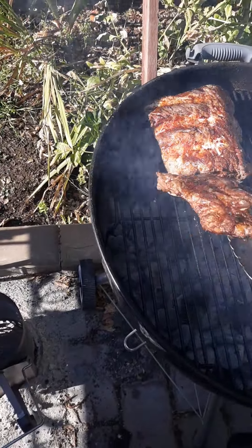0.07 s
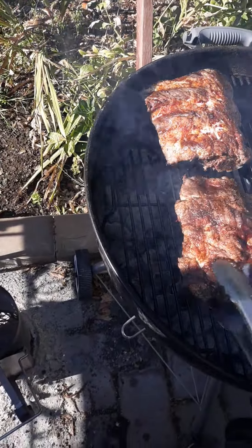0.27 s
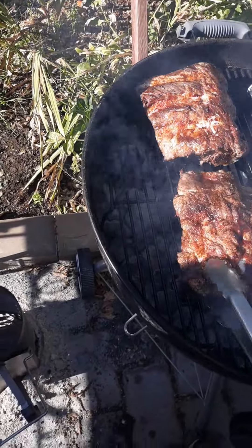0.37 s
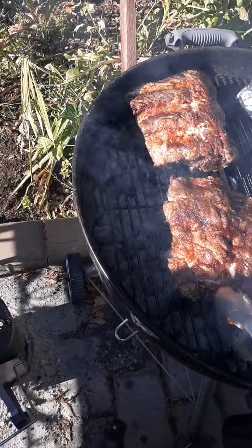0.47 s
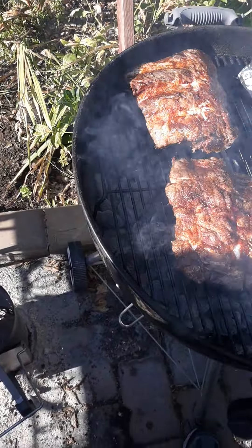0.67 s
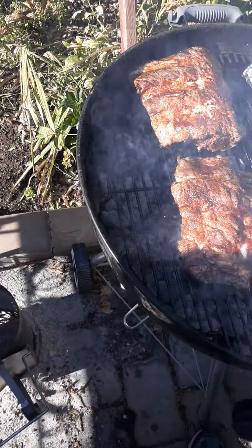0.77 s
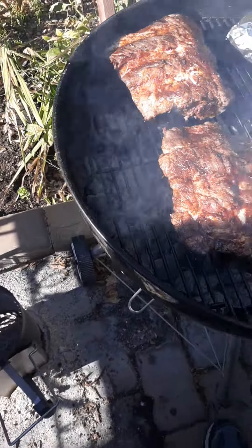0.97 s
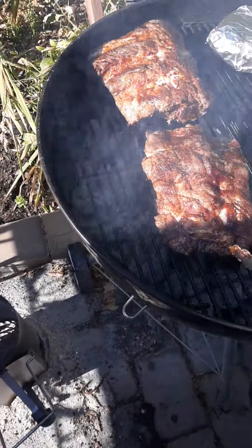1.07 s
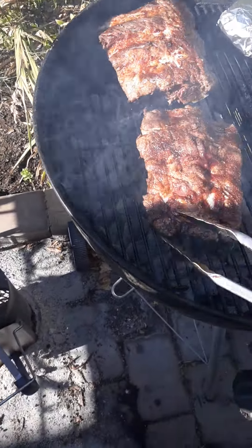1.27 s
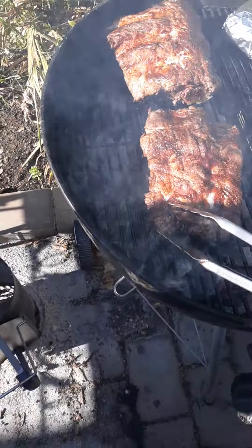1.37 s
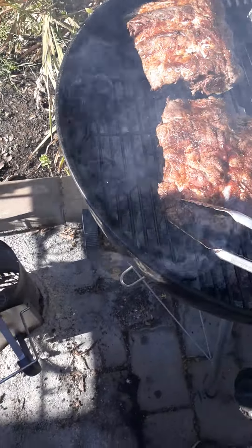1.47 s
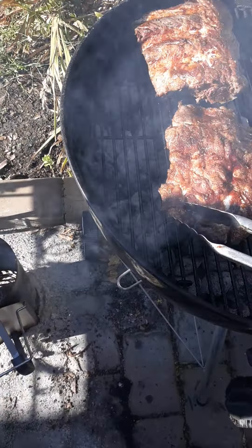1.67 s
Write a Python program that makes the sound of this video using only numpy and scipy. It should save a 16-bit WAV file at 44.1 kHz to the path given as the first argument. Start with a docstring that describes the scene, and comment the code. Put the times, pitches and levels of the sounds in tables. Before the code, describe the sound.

Meat sizzles on an outdoor grill after landing with thuds and a sharp metal clank.

```python
"""Outdoors at a kettle grill, a slab of ribs is laid on the hot grate.
The meat lands with dull thuds; the wire grate rings, jangles and clanks on its supports.
Juice boils off the wires in a sizzle that swells and dies away, and drops of fat pop.
Steel tongs scrape out from under the slab, over a low bed of outdoor air."""
import sys
import numpy as np
from scipy import signal
from scipy.fft import rfft, irfft, next_fast_len
from scipy.io import wavfile
from scipy.ndimage import uniform_filter1d

SR = 44100
rng = np.random.default_rng(int(sys.argv[2]) if len(sys.argv) > 2 else 0)


def unload_wav(signal):
    """Save mono or channel-first audio to the path in sys.argv[1] as 16-bit WAV at rate SR, clipped to [-1, 1]."""
    wavfile.write(
        sys.argv[1],
        SR,
        np.round(np.clip(np.atleast_2d(signal).T, -1, 1) * 32767).astype(np.int16),
    )


N = 74970
T = np.arange(N) / SR

# knocks on the grate: t/s, attack/s, place (0 middle, 1 rim), ring/dB, jangle/dB, clank/dB
KNOCKS = [(0.002, 0.0055, 0.11, -46, -42, -42.5), (0.217, 0.0027, 0.053, -32.5, -28.5, -39),
          (0.291, 0.008, 0.77, -40, -42, -58), (0.3217, 0.0032, 0.89, -54, -29, -23),
          (0.3257, 0.00079, 0.93, -34, -30, -14.5), (0.38, 0.0015, 0.12, -42, -33.5, -64)]


def from_db(db):
    """Decibels to gain."""
    return 10 ** (np.asarray(db) / 20)


def curve(points):
    """Automation line through (time, value) breakpoints."""
    return np.interp(T, *np.transpose(points))


def pan(db):
    """Constant-power stereo gains; positive dB leans left."""
    gains = from_db([[db / 2], [-db / 2]])
    return gains / np.sqrt(np.mean(gains ** 2))


def colour(x, spectrum):
    """Minimum-phase EQ through (Hz, dB) points; white noise keeps its level."""
    size = 2 * next_fast_len(N)
    hz, db = np.transpose(spectrum)
    bin_hz = np.arange(size // 2 + 1) * SR / size
    gain = from_db(np.interp(np.log(bin_hz + 1), np.log(hz), db))
    cepstrum = irfft(np.log(gain / np.sqrt(np.mean(gain ** 2))))
    cepstrum[1:size // 2] *= 2
    cepstrum[size // 2 + 1:] = 0
    return irfft(rfft(x, size) * np.exp(rfft(cepstrum)), size)[..., :N]


def resonate(x, hz, width_hz):
    """Resonance with a moving centre; white noise keeps its level."""
    radius = np.exp(-np.pi * width_hz / SR)
    turn = np.exp(2j * np.pi * np.cumsum(hz) / SR)
    return (turn * signal.lfilter([2 * np.sqrt(1 - radius)], [1, -radius], x / turn)).real


def dying(start, t60, rise=1e-6):
    """Envelope that builds to one at start, then falls 60 dB in t60 seconds."""
    return np.exp(np.minimum(T - start, 0) / rise - np.log(1000) * np.maximum(T - start, 0) / t60)


def click(s):
    """One unit click at s seconds."""
    return 1.0 * (np.arange(N) == int(s * SR))


def grains(per_s, spread_db, channels):
    """Random tiny clicks of uneven size, rms 1."""
    shape = (channels, N)
    sizes = from_db(spread_db * np.minimum(rng.exponential(1, shape), 6)) * rng.choice([-1, 1], shape)
    clicks = sizes * (rng.random(shape) < per_s / SR)
    return clicks / clicks.std()


def spaced(pair, alike_hz):
    """Two unrelated signals as mid and side: nearly mono in the bass, wide above."""
    side = signal.sosfilt(signal.butter(2, alike_hz, "high", fs=SR, output="sos"), pair[1])
    return pair[0] + (side + 0.15 * pair[1]) * np.array([[1], [-1]])


def air():
    """A low bed of outdoor noise."""
    spectrum = [(36, -24), (52, 7), (75, -8.5), (115, 5), (160, -6), (300, -3.5), (600, -6.5), (1300, -11),
                (2300, -22), (8000, -39)]  # outdoor rumble: f/Hz, level/dB
    levels = [(0, -52.5), (.9, -56), (1.55, -55.5), (1.7, -53.5)]  # its slow drift: t/s, level/dB
    noise = spaced(rng.standard_normal((2, N)), alike_hz=1010)
    return from_db(curve(levels)) * colour(noise, spectrum)


def rub(lag_samples=8, diffuse_db=-0.5):
    """Friction as dense small slips, reaching the right side a little sooner."""
    slips = grains(per_s=5000, spread_db=3, channels=3)
    direct = np.array([np.roll(slips[2], lag_samples), slips[2]])
    return (direct + from_db(diffuse_db) * slips[:2]) / np.sqrt(2)


def tongs():
    """Steel slides and catches under the meat; the arms ring at a pitch that moves with the contact."""
    strokes = [(0.98, 0.023, -53, -47.5), (1.038, 0.014, -49.5, -52), (1.079, 0.011, -45.5, -35.5),
               (1.1, 0.0073, -41.5, -32), (1.117, 0.0091, -45.5, -40), (1.238, 0.13, -51.5, -54.5),
               (1.462, 0.013, -70, -49), (1.529, 0.01, -69, -50.5)]  # scrapes: centre t/s, half length/s, body/dB, edge hiss/dB
    body_eq = [(300, -21.5), (650, -4.5), (950, 0), (1500, 2.5), (2000, -3.5), (6000, -19.5)]  # body of the scrape: f/Hz, level/dB
    edge_eq = [(1000, -24), (2250, -5.5), (2700, -2.5), (3100, 2), (3900, 4.5), (4800, -6.5), (6600, 5.5),
               (7700, -10.5), (16000, -40)]  # hiss of the steel edge: f/Hz, level/dB
    catches = [(0.9726, -28), (1.037, -28), (1.084, -17.5)]  # the tongs snag on a wire and jump free: t/s, level/dB
    arm_pitch = [(1.055, 930), (1.1, 1480), (1.125, 1720), (1.17, 1720), (1.175, 880)]  # arm resonance as the contact slides, then changes wire: t/s, f/Hz
    pings = [(0.028, -48.5, 2275, 0.093), (0.04, -46, 1337, 0.2)]  # faint ring of the loaded tongs: t/s, level/dB, f/Hz, t60/s
    body = edge_level = 0
    slips = rub()
    for s, half, body_db, edge_db in strokes:
        stroke = np.exp(-.5 * ((T - s) / half) ** 2)
        body += from_db(body_db) * stroke * slips
        edge_level += from_db(edge_db) * stroke
    body += sum(from_db(db) * click(s) for s, db in catches)
    ring = from_db(-2.5) * resonate(body, curve(arm_pitch), width_hz=160)
    for s, db, hz, t60 in pings:
        ring += from_db(db) * dying(s, t60, rise=0.0012) * np.sin(2 * np.pi * hz * T)
    return (colour(body, body_eq) + colour(edge_level * rub(), edge_eq) + ring) * pan(-6.5)


def pops(snap_height=6):
    """A drop of fat bursts: one snap and a few milliseconds of spray; some also have a lower crack."""
    drops = [(0.003, -28.5, -4, -8), (0.0728, -31.5, -10, -25), (0.083, -33, -8, -25),
             (0.1367, -37.5, -11, 3), (0.153, -41, -3, -25), (0.1778, -34.5, 0, -36),
             (0.6887, -19.5, 6, -20), (0.8719, -28.5, 3, -13.5), (0.985, -29, -5, -35),
             (1.629, -42.5, -15, -5)]  # bursting drops: t/s, level/dB, pan/dB, crack relative to spray/dB
    spray_eq = [(3000, -18), (4500, -1), (6800, 6.5), (8200, -3), (11800, 4.5), (15500, 4)]  # bright spray: f/Hz, level/dB
    crack_eq = [(1000, -6), (2800, -2), (5400, 0), (8000, -18)]  # lower crack: f/Hz, level/dB
    spray, crack = np.zeros((2, 2, N))
    for s, db, pan_db, crack_db in drops:
        burst = dying(s, t60=0.007) * rng.standard_normal((2, N))
        burst[0, int(s * SR)] -= snap_height
        burst[1, int(s * SR) + 1] -= snap_height
        spray += from_db(db) * pan(pan_db) * burst
        crack += from_db(db + crack_db) * pan(pan_db) * burst
    return colour(spray, spray_eq) + colour(crack, crack_eq)


def meat():
    """Soft landings push the grate for a few low cycles at most."""
    thuds = [(0.233, -23, 324, 0.0014), (0.246, -34.5, 199, 0.014), (0.341, -28.5, 190, 0.0029),
             (0.361, -28.5, 179, 0.0056), (0.3735, -24, 279, 0.0041), (0.396, -30.5, 191, 0.0026),
             (0.67, -45.5, 239, 0.022), (1.328, -46.5, 203, 0.0061)]  # the slab flops down: t/s, level/dB, f/Hz, half length/s
    return sum(from_db(db) * np.exp(-((T - s) / half) ** 2) * np.sin(2 * np.pi * hz * (s - T))
               for s, db, hz, half in thuds)


def grate_ring(load_s=0.31, settle_s=0.017, sag=0.04, waver_rad=0.77, wavers_per_s=34.1):
    """Knocks ring the grate's modes in a mix set by where they fall; the slab's weight sags the pitch."""
    # modes of grate and bowl: f/Hz, struck in the middle/dB, struck at the rim/dB, t60/s
    modes = [(148.1, -20, -4, 0.3), (209, -16, -5.5, 0.55), (244.5, -15, -5.5, 0.93),
             (262, -16.5, -1, 0.87), (332.2, 3, -13, 0.39), (440.3, -4.5, -16, 0.097),
             (500.5, -4.5, -3, .18), (556, -15, 2.5, 0.23), (780, 0, -8.5, 0.14), (1036, -8.5, -4.5, 0.11),
             (2000, 0.5, -16, 0.12), (2116, -28, -3.5, 0.43), (2400, -19, -23, 0.16), (2970, -2, -22, 0.14)]
    ring = np.zeros((2, N))
    load = (1 + np.tanh((T - load_s) / settle_s)) / 2
    sagging_time = np.cumsum(1 - sag * load) / SR
    for hz, middle_db, rim_db, t60 in modes:
        stereo_phase = rng.uniform(-np.pi, np.pi, (2, 1)) * min(hz / 2000, 1) ** 2
        energy = sum((from_db(db + middle_db + place * (rim_db - middle_db)) * dying(s, t60, rise)) ** 2
                     for s, rise, place, db, _, _ in KNOCKS)
        # the shifting meat makes the ring unsteady
        waver = waver_rad * np.interp(T * wavers_per_s, np.arange(N), rng.standard_normal(N))
        phase = 2 * np.pi * hz * sagging_time + rng.uniform(0, 2 * np.pi)
        ring += np.sqrt(energy) * np.sin(phase + stereo_phase + waver)
    return ring * pan(-1.0)


def wire_modes(mean_gap_hz=22.97):
    """A dense, uneven set of steady partials, each heard differently left and right; rms 1."""
    shape = (2, N // 2 + 1)
    present = rng.random(shape[1]) < SR / N / mean_gap_hz
    partials = irfft(present * (rng.standard_normal(shape) + 1j * rng.standard_normal(shape)), N)
    return partials / partials.std()


def grate_jangle(muffled_below_hz=900):
    """Each knock sets the wires jangling; the meat muffles the low bands to noise."""
    spectrum = [(250, -9.5), (620, -6.5), (1000, -7.5), (1600, -12.5), (2100, -2), (3100, -3), (4500, -9),
                (7000, -14.5), (8200, -23.5), (16000, -15)]  # dense modes of the wires: f/Hz, level/dB
    jangle = np.zeros((2, N))
    edges_hz = np.geomspace(250, 16000, 7)
    for low, high in zip(edges_hz, edges_hz[1:]):
        t60 = 0.31 * (2000 / np.sqrt(low * high)) ** 0.4  # higher bands die sooner
        wires = rng.standard_normal((2, N)) if low < muffled_below_hz else wire_modes()
        band = signal.sosfilt(signal.butter(2, [low, high], "band", fs=SR, output="sos"), wires)
        energy = sum((from_db(db) * dying(s, t60, rise)) ** 2 for s, rise, _, _, db, _ in KNOCKS)
        jangle += band * np.sqrt(energy)
    return spaced(colour(jangle, spectrum), alike_hz=610) / np.sqrt(2) * pan(-1.5)


def grate_clank(hit_t60=0.0059, chatter_t60=0.078, ring_t60=0.09, chatter_db=-8, snap_height=4):
    """The grate hits its supports: a hard snap, a tail of chatter and a short bright ring."""
    spectrum = [(100, -42.5), (400, -25.5), (1000, 1.5), (1700, -9), (3200, -0.5), (5300, 3.5), (7100, -1),
                (8300, -17), (16000, -14)]  # steel on steel: f/Hz, level/dB
    modes = [(3400, -13), (4690, -15), (5280, -21)]  # partials of the struck steel: f/Hz, level/dB
    contact, snap, ring_level = np.zeros((3, N))
    for s, rise, *_, db in KNOCKS:
        chatter = from_db(chatter_db) * dying(s, chatter_t60, rise)
        contact += from_db(db) * (dying(s, hit_t60, rise) + chatter)
        snap += snap_height * from_db(db) * click(s)
        ring_level += from_db(db) * dying(s, ring_t60, rise)
    partials = sum(from_db(db) * np.sin(2 * np.pi * (hz * T + rng.random((2, 1)))) for hz, db in modes)
    impact = colour(contact * rng.standard_normal((2, N)) + snap, spectrum)
    return (impact + ring_level * partials) * pan(-8.5)


def sizzle(mono_share=0.1, flutter_db=1.56, sheen_hz=8300):
    """Juice boils off the hot wires in countless tiny bursts, with lone ticks among them."""
    levels = [(0, -43), (.1, -44), (.19, -48), (.3, -42.5), (.39, -34), (.5, -38.5), (.7, -40.5),
              (.92, -40.5), (1.1, -48), (1.34, -46), (1.385, -51.5), (1.5, -44), (1.6, -54.5), (1.7, -51.5)]  # swell and fade of the boiling: t/s, level/dB
    spectrum = [(600, -9.5), (2400, -11.5), (4000, -2.5), (5500, -0.5), (6500, 5), (7100, 2), (7800, -10),
                (10500, -3), (12700, 0), (14200, -2), (15600, -1)]  # tone of the bursts: f/Hz, level/dB
    sheen = [(0, -4.5), (.3, -2), (.5, 1.5), (.75, 2), (1, -0.5)]  # treble shelf above sheen_hz: t/s, level/dB
    bursts = grains(per_s=18000, spread_db=3.0, channels=3)
    fizz = np.sqrt(1 - mono_share) * bursts[:2] + np.sqrt(mono_share) * bursts[2]
    fizz += from_db(-18) * grains(per_s=90, spread_db=4.5, channels=1)  # lone ticks
    flutter = uniform_filter1d(rng.standard_normal(N), size=500)
    level_db = curve(levels) + flutter_db * flutter / flutter.std()
    treble = signal.sosfiltfilt(signal.butter(2, sheen_hz, "high", fs=SR, output="sos"), fizz)
    fizz += treble * (from_db(curve(sheen)) - 1)
    return colour(fizz * from_db(level_db), spectrum) * pan(-2.5)


def scene():
    """Everything at the grill, heard from just above it."""
    return grate_ring() + grate_jangle() + grate_clank() + meat() + sizzle() + pops() + tongs() + air()


def record(dry):
    """Soft clipping rounds the loudest peak; the deep bass and the very top are cut."""
    ceiling, low_cut_hz, high_cut_hz = 0.8, 74, 15900
    rounded = ceiling * np.tanh(dry / ceiling)
    thinned = signal.sosfilt(signal.butter(2, low_cut_hz, "high", fs=SR, output="sos"), rounded)
    return signal.sosfilt(signal.ellip(12, .2, 70, high_cut_hz, fs=SR, output="sos"), thinned)


dry = scene()
out = record(dry)
unload_wav(out)
```